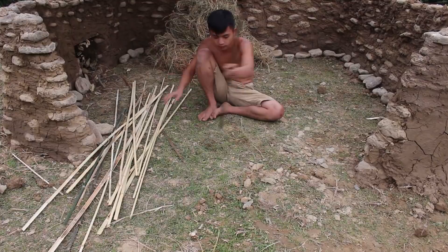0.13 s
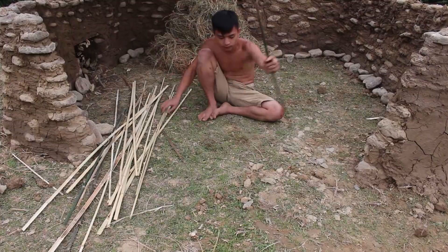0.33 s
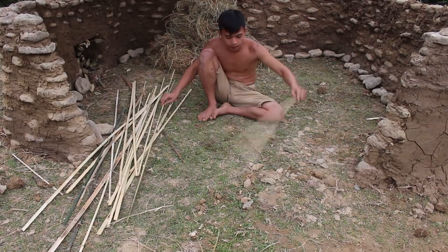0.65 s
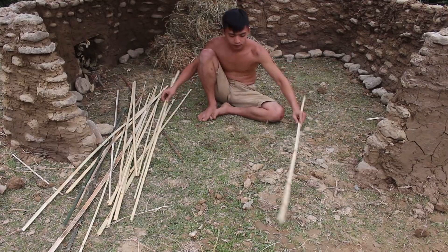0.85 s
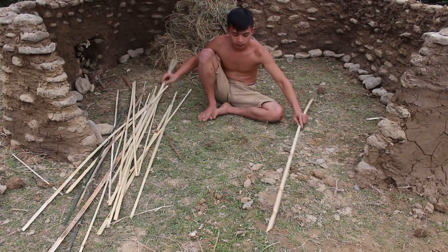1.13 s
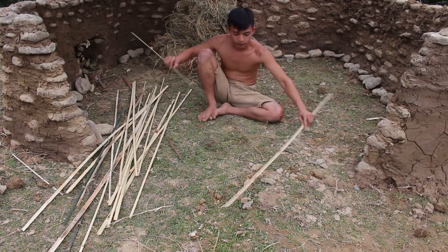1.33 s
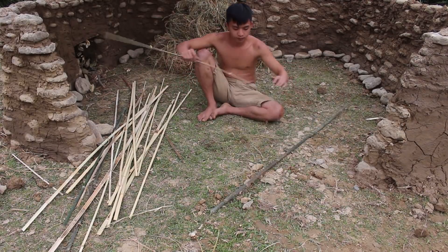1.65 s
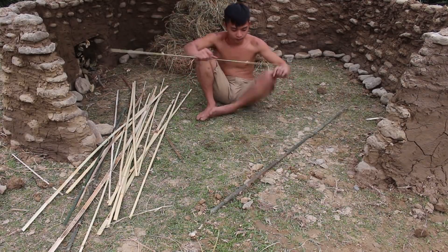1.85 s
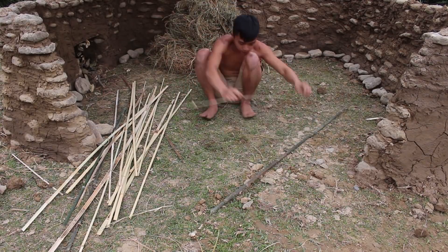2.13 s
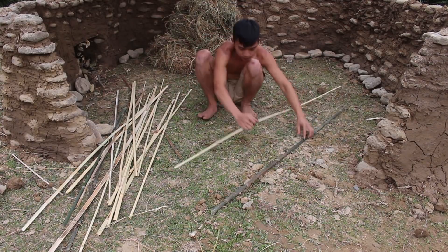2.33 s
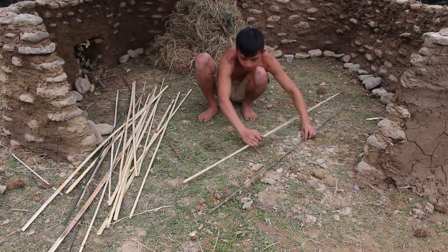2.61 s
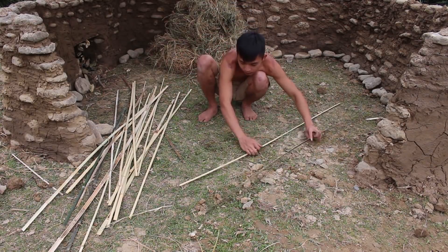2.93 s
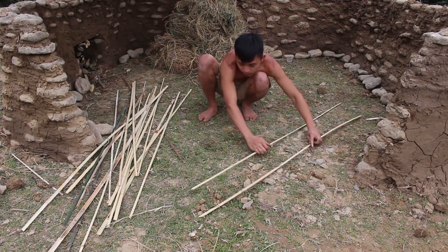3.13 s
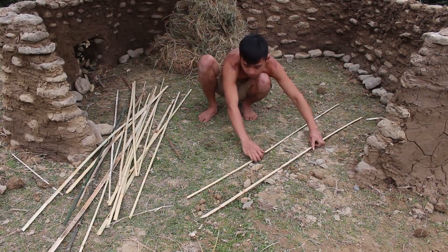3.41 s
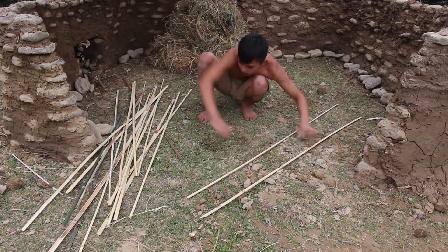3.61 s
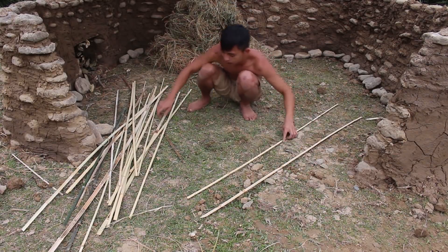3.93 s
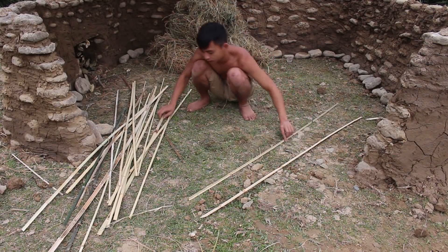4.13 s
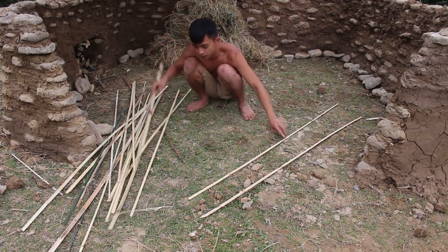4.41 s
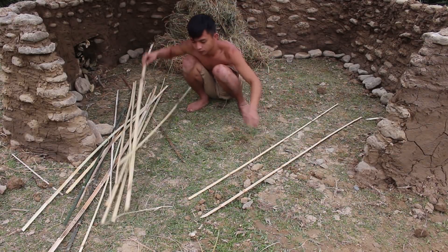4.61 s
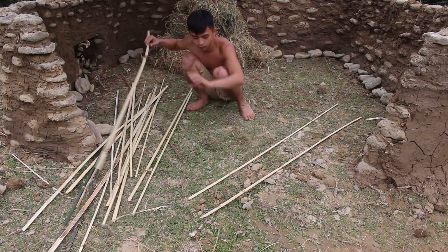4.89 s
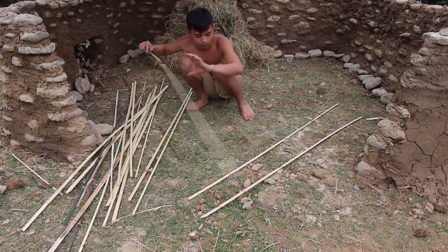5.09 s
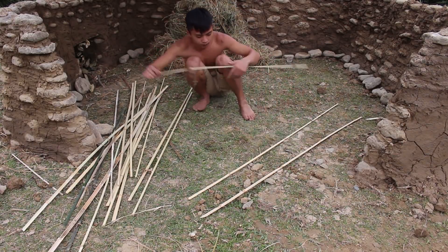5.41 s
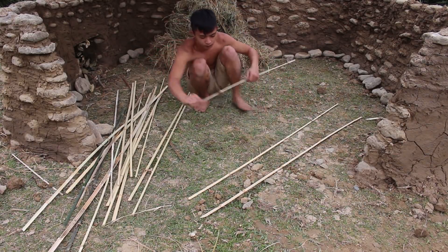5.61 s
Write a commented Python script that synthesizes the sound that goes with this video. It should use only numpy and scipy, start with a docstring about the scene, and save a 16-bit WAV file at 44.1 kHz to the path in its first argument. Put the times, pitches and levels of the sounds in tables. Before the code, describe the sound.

Someone handles thin split bamboo inside low stone walls: small ticks, brittle clacks as poles meet and land on short grass, faint dry rustling between. After a quiet middle, a pole dragged from the pile sets off a quick swelling rattle and a loud snap, then things settle. Wide quiet outdoor air, faint trickling water far off, very short stony reflections, and one faraway bird chirp at the end.

```python
"""Broad outdoor hiss (filtered noise) and far water (ringing bubbles) last throughout. Thin split bamboo
poles are drawn from a pile and laid on short dry grass inside low stone walls: a few light ticks, four
bursts of cracks in the first 2.3 s, sparser scraping, then the densest clatter from 4.5 s to 5.1 s.
Contact and friction forces ring the poles' bending modes, knocks ring their hollows and thud in the turf,
and the walls scatter it all. At 5.36 s a far bird whistles once, a falling sine."""
import sys
import numpy as np
from scipy import signal
from scipy.fft import rfft, irfft
from scipy.io import wavfile
from scipy.ndimage import uniform_filter1d

SR = 44100
rng = np.random.default_rng(int(sys.argv[2]) if len(sys.argv) > 2 else 0)


def volts_from_decibels(level):
    """Turn decibel levels (scalar or array-like) into linear amplitude factors."""
    exponent = np.asarray(level, float) / 20
    return 10 ** exponent


def generate_wav(signal):
    """Clip the signal to [-1, 1] and save it as 16-bit WAV at the path in sys.argv[1]."""
    frames = np.transpose(np.atleast_2d(signal))
    scaled = np.clip(frames, -1, 1) * 32767
    pcm = np.round(scaled).astype(np.int16)
    wavfile.write(sys.argv[1], SR, pcm)


N = 253575

# Pole against pole: t/s, level/dB, place of contact (0 thick end, 2 thin end; may lie beyond),
# chatter t60/s, hard first contact relative to the chatter/dB
TAPS = [(0.1765, -48.5, 0.78, 0.061, 12), (0.2324, -47.0, 0.74, 0.04, 1), (0.269, -47.4, 0.6, 0.025, -2),
        (0.5108, -61, 2.3, 0.05, 13), (0.5759, -56.2, 1.78, 0.022, 5), (0.8511, -35.5, 0.9, 0.022, 8.5),
        (0.8525, -36.8, 0.2, 0.017, -10), (0.8726, -48.5, 1, 0.045, 3), (0.941, -46.5, 1.7, 0.03, 0),
        (0.9792, -54.3, 1.65, 0.03, 0), (1.1713, -36.6, 1.23, 0.05, 9.5), (1.195, -29, 0.34, 0.027, 2),
        (1.2015, -27.5, 1.1, 0.032, 12), (1.21, -33.5, 1.1, 0.035, -1.5), (1.2334, -46.7, 0.82, 0.03, 13),
        (1.25, -46.5, 2, 0.04, 4), (1.2746, -49, 0, 0.022, 3), (1.2941, -42, 1.1, 0.03, 1),
        (1.472, -36, 0.38, 0.03, 9), (1.4775, -33, 0.57, 0.0215, 4.5), (1.4916, -40, 0.2, 0.03, -0.5),
        (1.498, -49, 1.67, 0.04, 9), (1.5275, -52.5, 1.4, 0.06, 6), (1.5626, -55.5, 0.81, 0.02, 17),
        (1.5994, -53.0, 0.15, 0.02, 13), (1.659, -48.5, -0.3, 0.041, 11), (1.7533, -34, 0.6856, 0.045, 4.5),
        (2.229, -24, 0.97, 0.012, 10), (2.234, -34.0, 0.31, 0.04, -3), (2.2611, -42.5, 0.58, 0.027, 5),
        (2.2726, -45.0, 0.5, 0.04, 11.5), (2.2766, -29, 0.96, 0.03, 2.5), (2.283, -35, 0.3, 0.02, 8),
        (2.287, -48, 0, 0.0163, 10), (2.399, -49.3, 1.2, 0.02, 12), (2.4208, -47, 0.86, 0.04, 11.5),
        (2.6738, -57, 1, 0.05, 4), (2.7537, -41.5, 1.06, 0.043, 3), (3.161, -49, 0.7, 0.024, 11.5),
        (3.1734, -43, 0.8, 0.05, 11), (3.193, -40.5, 0.46, 0.037, 4.5), (4.0259, -54.5, 1.3, 0.042, 10),
        (4.0706, -48, 2.04, 0.0218, 5), (4.1287, -60.5, 1.15, 0.035, 11), (4.375, -42, 2.2, 0.07, 0),
        (4.4752, -47.2, 0, 0.04, 3), (4.494, -41.5, 0.2, 0.043, 4), (4.5561, -31, 0.4, 0.03, 1),
        (4.562, -24.5, 1.3, 0.0635, -2), (4.566, -31.6, 2, 0.035, -8), (4.573, -31.9, 1, 0.034, 1),
        (4.5794, -37.5, 0.3, 0.032, 13), (4.601, -34.5, 1, 0.039, 12), (4.6127, -33.5, 1.76, 0.05, -1),
        (4.6204, -36.9, 1.86, 0.02, 3), (4.625, -40, 1.5, 0.017, 7), (4.6483, -39.9, 1.87, 0.02, 10),
        (4.6593, -46, 2, 0.04, 15.5), (4.671, -34.5, 1.19, 0.078, 10), (4.6762, -30.5, 1, 0.028, 6),
        (4.6878, -35, 1.1, 0.036, 11), (4.713, -37.1, 2.5, 0.065, 4), (4.72, -38, 1.67, 0.04, 3),
        (4.7683, -43.5, 1.5, 0.03, 12), (4.8102, -47.7, 0.7, 0.02, 16), (4.813, -38.5, 0.9, 0.028, 2),
        (4.8331, -22, 1.59, 0.017, 13.5), (4.8356, -17.5, 1.3, 0.019, 2), (4.8397, -27.5, 0.9, 0.013, 5),
        (4.8442, -30.8, 1.5, 0.017, 4), (4.855, -36, 1.94, 0.025, 6), (4.8974, -40, 1.3, 0.035, 12),
        (4.9018, -38.3, 1, 0.028, 10), (4.915, -46.6, 1.97, 0.04, 2), (4.9347, -41, 1.02, 0.041, 8),
        (4.942, -46, 1, 0.045, 2), (4.9591, -50.0, 1.76, 0.022, 1), (5.084, -44.5, -0.84, 0.02, -2)]


def rms_one(x):
    """Normalisation: scale to unit rms."""
    return x / np.sqrt(np.mean(x ** 2) + 1e-20)


def at_hz(points, hz):
    """Interpolation of a spectrum along a logarithmic frequency axis."""
    points_hz, values = np.transpose(points)
    return np.interp(np.log(hz), np.log(points_hz), values)


def drift(rate_hz):
    """Low-passed noise: a slow random wander of unit spread, from two equal poles at rate_hz."""
    step = 40   # samples between computed points
    r = np.exp(-2 * np.pi * rate_hz * step / SR)
    noise = rng.standard_normal(N // step + 2002)
    slow = signal.lfilter([1], [1, -2 * r, r * r], noise)[2000:]   # the start of the filter is left out
    return np.interp(np.arange(N) / step, np.arange(len(slow)), rms_one(slow))


def ring(clicks, hz, t60):
    """Damped resonator: a unit click sets a decaying sine of height 1 ringing."""
    r, w = volts_from_decibels(-60 / (t60 * SR)), 2 * np.pi * hz / SR
    return signal.lfilter([0, np.sin(w)], [1, -2 * r * np.cos(w), r * r], clicks + 1e-18)


def grains(per_s, spread_db):
    """Shot noise: random clicks of either sign with a long tail of large ones; unit rms."""
    sizes = volts_from_decibels(spread_db * np.minimum(rng.exponential(1, N), 5)) * rng.choice([-1, 1], N)
    return rms_one(sizes * (rng.random(N) < per_s / SR))


def coloured(x, spectrum):
    """Linear filtering: multiply the spectrum of x by a given one; unit rms."""
    hz = np.maximum(np.fft.rfftfreq(N, 1 / SR), 1)
    return rms_one(irfft(rfft(x) * volts_from_decibels(at_hz(spectrum, hz)), N))


def both_sides(pan_db):
    """Level-difference panning: gains of the left and right port."""
    return volts_from_decibels([pan_db / 2, -pan_db / 2])


def air():
    """Partial coherence: wide hiss whose two sides correlate by a share that depends on frequency."""
    # relative spectrum of the hiss: f/Hz, level/dB
    hiss_spectrum = [(15, -58), (25, -32), (48, -10), (97, -6), (154, -5.5), (226, -6), (245, -6.5),
                     (524, -6), (687, -6.5), (787, -5.5), (854, -7), (1880, -6.5), (12600, -25),
                     (15200, -26), (16500, -50)]
    # likeness of the two sides: f/Hz, correlation
    likeness = [(60, 0.73), (130, -0.038), (290, -0.378), (640, 0.044), (1410, 0.087), (3100, 0.4),
                (6820, 0.257), (15000, 0.018)]
    # balance of the two sides: f/Hz, left over right level/dB
    leaning = [(60, 2.5), (240, 1), (950, 1.5), (3770, -1.5), (15000, 0)]
    hz = np.maximum(np.fft.rfftfreq(N, 1 / SR), 1)
    alike = np.clip(at_hz(likeness, hz), -1, 1)
    mid, side = rfft(rng.standard_normal((2, N)))
    pair = np.sqrt(1 + alike) * mid + np.sqrt(1 - alike) * side * [[1], [-1]]
    white = irfft(both_sides(at_hz(leaning, hz)) * pair, N)
    level_db = -52 + 1.26 * drift(3.85)
    return volts_from_decibels(level_db) * coloured(white, hiss_spectrum)


def water():
    """Bubble resonance: each bubble rings a few cycles, rising in pitch, somewhere across the stereo field."""
    level_db, bubbles_per_s = -61.5, 150
    low_hz, high_hz, cycles, rise = 450, 2800, 12.5, 0.12
    out, t = np.zeros((2, N + 4096)), np.arange(4096) / SR
    for when, pitch, big, side in rng.random((int(bubbles_per_s * N / SR), 4)):
        hz = low_hz * (high_hz / low_hz) ** pitch
        age = t[:int(cycles / hz * SR)] * hz / cycles   # 0 to 1 over the bubble's life
        fade = volts_from_decibels(-40 * age) * (1 - np.exp(-age / 0.05))
        wave = np.sin(2 * np.pi * cycles * (age + rise * age ** 2)) * fade
        size = volts_from_decibels(-3.5 * np.log(1 - big * 0.96) + 3.0 * pitch)
        at = int(when * N)
        lag = int(side * 6)   # samples: bubbles towards the right reach the left port later
        out[0, at + lag:at + lag + len(wave)] += size * wave * np.sqrt(1 - side)
        out[1, at:at + len(wave)] += size * wave * np.sqrt(side)
    return volts_from_decibels(level_db) * rms_one(out[:, :N])


def bird():
    """Frequency glide: one faint falling whistle far away, its envelope blurred by the air."""
    start_s, length_s, level_db, fade_db_per_s = 5.36, 0.102, -61.5, 100
    start_hz, fall_hz_per_s = 5720, 6200
    age = np.arange(N) / SR - start_s
    hz = start_hz - fall_hz_per_s * np.clip(age, 0, length_s) + 25 * drift(60)
    sings = volts_from_decibels(level_db - fade_db_per_s * age) * (age > 0) * (age < length_s)
    return uniform_filter1d(sings, size=900) * np.sin(2 * np.pi * np.cumsum(hz) / SR)


def walls(x):
    """Diffuse reflection: rough stone scatters sound back as a short noise tail, another on each side."""
    scatter_db, scatter_t60_s, delay_s = -10, 0.014, 0.002
    t = np.arange(N // 100) / SR
    tail = rng.standard_normal((2, len(t))) * volts_from_decibels(-60 * t / scatter_t60_s) * (t > delay_s)
    tail *= volts_from_decibels(scatter_db) / np.sqrt(np.sum(tail ** 2, axis=1, keepdims=True))
    return signal.fftconvolve(x, tail, axes=1)[:, :N]


def knocks(rub):
    """Cavity resonance: a soft blow rings the pole's hollow and thuds in the turf; rub makes both murmur."""
    # pole on the ground: t/s, level/dB, hollow pitch f/Hz, thud over hollow level/dB
    ground_blows = [(0.85, -38, 784, -7), (0.861, -43, 910, -5), (0.877, -35.5, 845, -14),
                    (0.888, -40, 763, -23), (1.17, -41, 790, -20), (1.198, -39, 723, -19),
                    (1.472, -40, 820, -11), (1.753, -43.5, 906, -15), (2.231, -33.5, 792, -19),
                    (2.241, -39, 794, -23), (2.262, -42, 930, -26), (2.277, -41.5, 800, -22),
                    (4.55, -37.5, 890, -24), (4.599, -45, 709, -17), (4.661, -43.5, 794, -7),
                    (4.679, -44.5, 665, -12)]
    # the split tube rings unevenly: share of pitch, level/dB
    split_wall = [(1.01, 0.5), (1.17, -8.5), (0.874, -11)]
    # resonances of the turf: f/Hz, level/dB, t60/s
    turf_modes = [(242, -4, 0.062), (408, -1, 0.057)]
    knock_t60_s, rise_s = 0.034, 0.0014
    hollow = volts_from_decibels(-31.5) * ring(rub, 702.6, 0.0194)
    thump = volts_from_decibels(-40.5) * rub
    t = np.arange(N // 50) / SR
    for s, level_db, hz, thud_db in ground_blows:
        at = round(s * SR)
        fade = volts_from_decibels(level_db - 60 * t / knock_t60_s) * (1 - np.exp(-t / rise_s))
        tones = sum(volts_from_decibels(db) * np.sin(2 * np.pi * share * hz * t) for share, db in split_wall)
        hollow[at:at + len(t)] += fade * tones
        thump[at] += volts_from_decibels(level_db + thud_db)
    turf = sum(volts_from_decibels(db) * ring(thump, hz, t60) for hz, db, t60 in turf_modes)
    return hollow + signal.sosfilt(signal.butter(2, [150, 600], "band", fs=SR, output="sos"), turf)


def by_place(db, place, middle_db):
    """Modal excitation: gain into the low, middle and high modes for a contact at this place."""
    focus_db = 6   # loss of a group of modes one step away from the place of contact
    centre_db, centre_width = 3, 0.15   # a contact close to mid-length favours the middle modes
    group = np.arange(3)
    centred_db = centre_db * np.exp(-((place - 1) / centre_width) ** 2)
    gain_db = db - focus_db * (group - place) ** 2 + (middle_db + centred_db) * (group == 1)
    return volts_from_decibels(gain_db)[:, None]


def pressure():
    """Friction load: how hard surfaces rub, per group of modes; strokes swell and fade, taps leave a rattle."""
    # a pole slides on poles or dry grass: t/s of most pressure, level/dB, place (0 thick end, 2 thin end),
    # swell/s, fade/s (both for 60 dB)
    strokes = [(0.0, -63, 1.66, 0.109, 0.2), (0.2, -64.5, .9, .12, 1.0), (0.33, -57.5, 1.1, 0.58, 0.7),
               (0.87, -45.5, 1.56, .06, 0.18), (1.0, -63, 1.3, 1.0, 0.2), (1.22, -42.5, 0.82, 0.077, 0.1),
               (1.52, -56.5, 0.47, .15, 1.5), (1.9, -59.5, 0.8, 0.71, .5), (2.09, -58, 0.77, 0.26, 0.9),
               (2.24, -46, .1, 0.037, 0.08), (2.282, -42, 1.2, .03, 0.02), (2.43, -67, 0.93, .3, 4),
               (3.18, -55, 0.65, .15, 0.04), (2.76, -63, 0.96, .08, 1.5), (2.965, -60.5, 0.87, .05, 0.31),
               (3.31, -59, 1.25, .15, 0.4), (3.35, -62.5, 1.5, .3, 0.3), (3.9, -61.5, 0.45, 1.4, 1.0),
               (4.27, -64, 1.9, .08, 0.5), (4.35, -56, 1.7, .4, 0.2), (4.44, -49, 1.7, 0.27, 0.36),
               (4.49, -46.5, 1.63, 0.46, 0.63), (4.53, -50.5, 0.38, 0.628, 0.8),
               (4.61, -45.5, .6, 0.13, 0.18), (4.57, -36.5, 1.13, 0.11, 0.32),
               (4.69, -43.5, 0.82, .1, 0.35), (4.74, -57, 1.3, .2, 0.6), (4.87, -59, 1.06, 0.112, 0.56),
               (5.6, -61, 0.76, 0.38, 6)]
    stir_db = -76.5   # the pile never lies quite still
    middle_db = -4    # the middle modes answer a little less than their neighbours
    rattle_db, rattle_t60_s = -17, (0.19, 0.097, 0.15)   # a struck pole rattles on: low, middle, high modes
    t, out = np.arange(N) / SR, np.full((3, N), volts_from_decibels(stir_db))
    for s, db, place, swell, fade in strokes:
        shape_db = -60 * np.maximum((s - t) / swell, (t - s) / fade)
        out += by_place(db, place, middle_db) * volts_from_decibels(shape_db)
    struck = np.zeros((3, N))
    for s, db, place, *contact in TAPS:
        struck[:, round(s * SR)] = by_place(db + rattle_db, place, middle_db)[:, 0] ** 2
    # the rattle is a power, so its gain per sample is that of an amplitude squared
    rattle = [signal.lfilter([1], [1, -volts_from_decibels(-120 / (t60 * SR))], power + 1e-18)
              for power, t60 in zip(struck, rattle_t60_s)]
    return np.sqrt(out ** 2 + rattle)


def sliding():
    """Friction noise: force on the three groups of modes from dense fine grains, slightly clumped."""
    fibres = np.array([grains(22000, 3.7) for group in range(3)])
    return fibres * pressure() * volts_from_decibels(2.23 * drift(56))


def taps():
    """Impact: force on the three groups of modes, one hard contact in a dying chatter of small ones."""
    middle_db = -2   # the middle modes answer a little less than their neighbours
    t = np.arange(N // 50) / SR
    force, contacts = np.zeros((3, N)), grains(12000, 2.5)
    kick = 4.57 * np.array([-0.25, 1, -0.05])   # the hard contact lasts three samples
    for s, db, place, t60, snap_db in TAPS:
        at = round(s * SR)
        chatter = volts_from_decibels(-60 * t / max(t60, 0.003)) * (1 - np.exp(-t / 0.00033))
        touch = chatter * contacts[at:at + len(t)]
        touch[8:11] += volts_from_decibels(snap_db) * kick
        force[:, at:at + len(t)] += by_place(db, place, middle_db) * touch
    return force


def poles(force):
    """Modal synthesis: forces ring bending modes of wandering strength; surfaces also radiate the force."""
    # bending modes of a pole in three groups, low, middle and high: f/Hz, level/dB, t60/s
    pole_modes = [
        [(1240, -3.5, 0.008), (1644, -2.5, 0.012), (2203, 5, 0.0066), (3220, 14, 0.0017),
         (3960, -11.5, 0.00077), (4060, -6, 0.0036)],
        [(5230, 5, 0.002), (5520, 2, 0.0032), (6510, -1, 0.0038), (7050, 2, 0.0016)],
        [(8800, 7.5, 0.0013), (9920, 7, 0.0023), (11290, 8, 0.0015), (12670, 6, 0.0019), (16000, -18.5, 0.0035)],
    ]
    # band of each group: lower f/Hz, upper f/Hz
    ring_edges_hz = [(1000, 5000), (4500, 8200), (7700, 15600)]
    surface_share = 0.35
    out = 0
    for modes, drive, edges in zip(pole_modes, force, ring_edges_hz):
        # rms response of the group to white force: a damped sine of height 1 has energy t60 * SR / 27.6
        strength = np.sqrt(sum(volts_from_decibels(2 * db) * t60 * SR / 27.6 for hz, db, t60 in modes))
        # the strengths wander with the point of contact; neighbours have opposite signs
        rings = sum((-1) ** k * ring(drive * volts_from_decibels(db + 2.0 * drift(69)), hz, t60)
                    for k, (hz, db, t60) in enumerate(modes))
        # the root makes up for the power lost outside the band
        surface = surface_share * drive * np.sqrt(SR / 2 / (edges[1] - edges[0]))
        band = signal.butter(2, edges, "band", fs=SR, output="sos")
        out = out + signal.sosfilt(band, rings / strength + surface)
    return out


def scene():
    """Superposition: poles nearly in front of the two ports, water and hiss around, the bird far off."""
    # side of the poles: t/s, left over right level/dB
    where = [(0, 2), (.9, 3.5), (1.2, 3.5), (1.5, 2), (1.75, 4), (2.25, 1), (3.2, 1.35), (4.3, 4),
             (4.6, 3.5), (4.9, 3), (5.75, 3)]
    left_lag = 3   # samples by which far sounds reach the left port later: they lie a little to one side
    blows, rub = taps(), sliding()
    pan_db = np.interp(np.arange(N) / SR, *np.transpose(where))
    near = (poles(blows + rub) + knocks(rub[0] + 0.45 * blows[0])) * both_sides(pan_db)
    left, right = water() + air()
    far = np.array([np.roll(left, left_lag), right])
    return near + walls(near) + far + bird()


def roll_off(x):
    """The treble ends steeply here."""
    return signal.sosfilt(signal.butter(12, 16980, fs=SR, output="sos"), x)


def record(dry):
    """Low-pass filtering: the top treble is rolled off steeply above 15.7 kHz."""
    dulled = signal.sosfilt(signal.butter(14, 15700, fs=SR, output="sos"), dry)
    return roll_off(dulled)


dry = scene()
out = record(dry)
generate_wav(out)
```